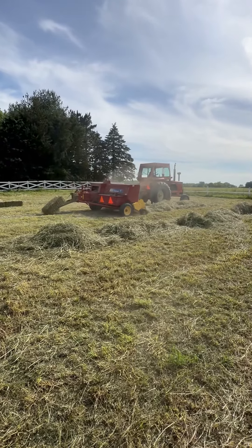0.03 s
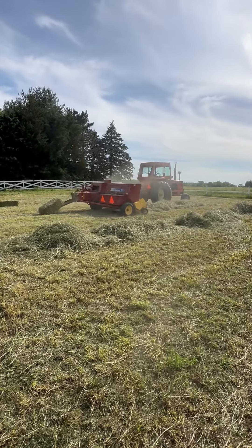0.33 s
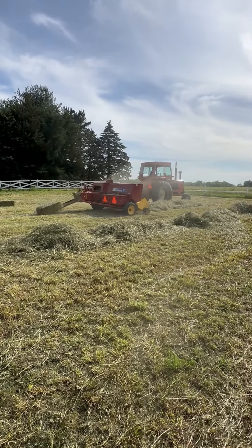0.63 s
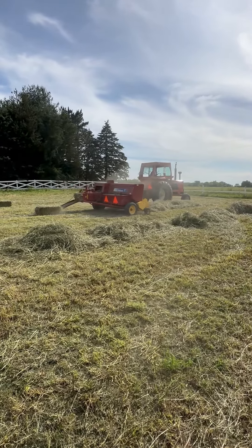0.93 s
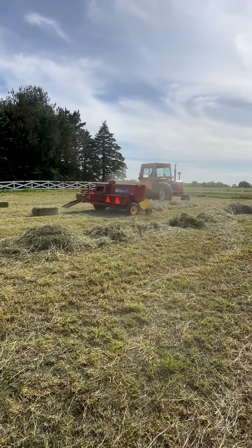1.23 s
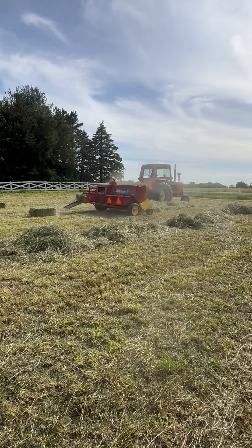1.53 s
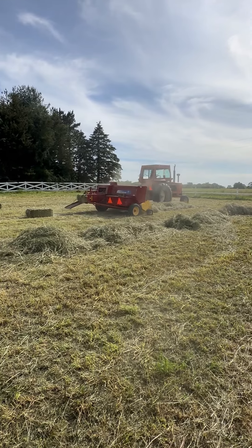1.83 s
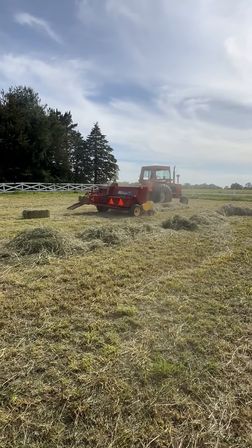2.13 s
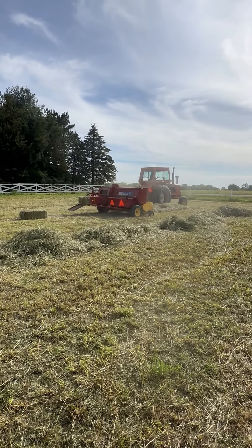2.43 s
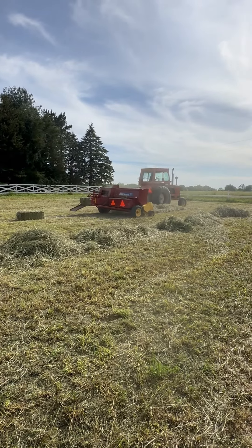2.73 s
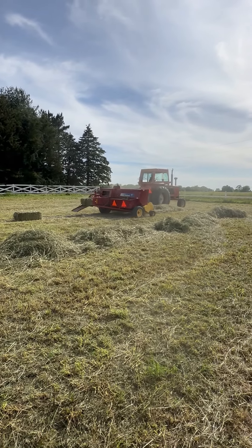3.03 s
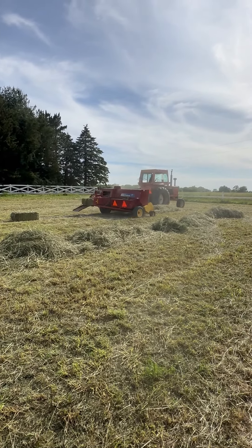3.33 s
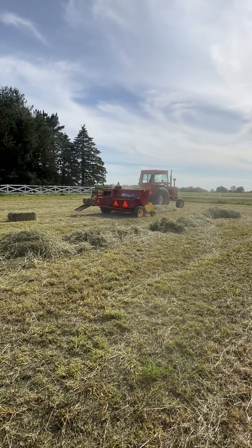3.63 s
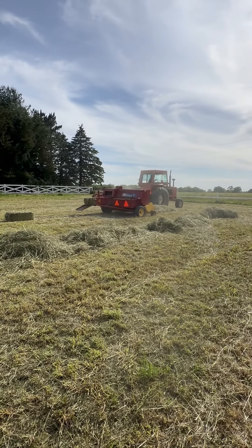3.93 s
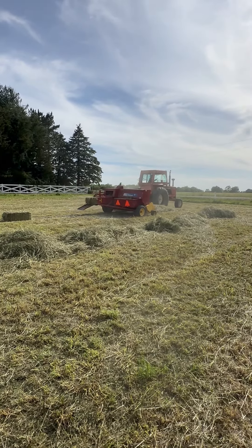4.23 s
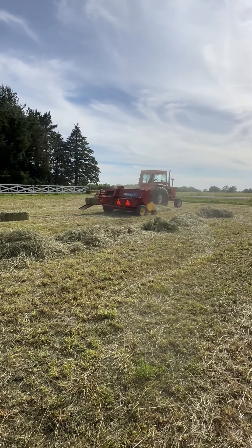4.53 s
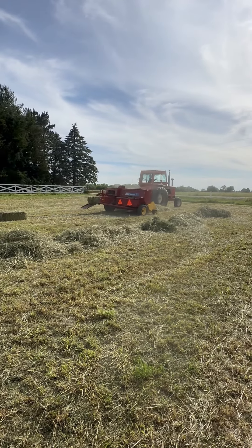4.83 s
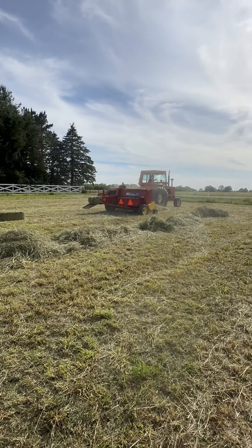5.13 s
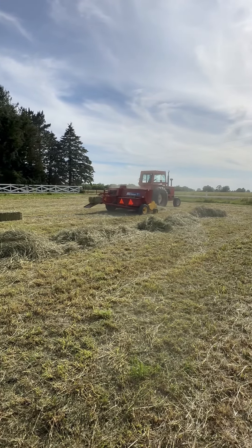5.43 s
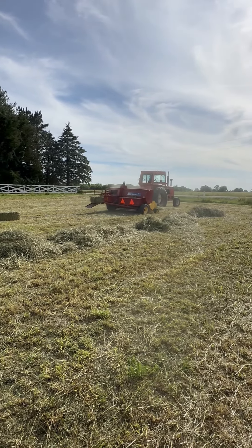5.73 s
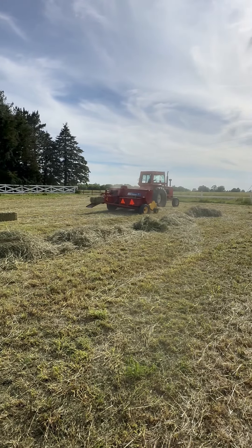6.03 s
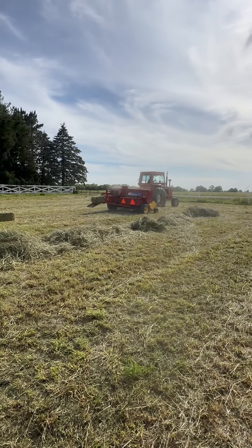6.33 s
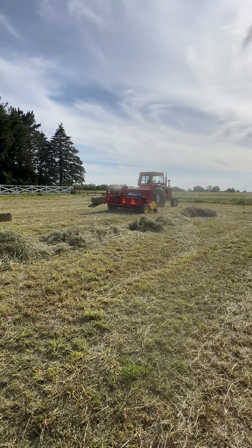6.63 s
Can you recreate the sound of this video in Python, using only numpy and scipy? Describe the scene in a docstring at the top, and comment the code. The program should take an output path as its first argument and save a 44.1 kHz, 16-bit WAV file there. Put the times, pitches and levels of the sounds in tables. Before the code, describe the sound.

Rhythmic crunching thumps and metal rattles of a hay baler working a field over the low hum of a diesel tractor.

```python
"""A low drone and rumble, broken about 83 times a minute by a clack and a crunching thud: a tractor
draws a small square baler slowly away over a hay field, some 20 m from a phone. Periodic firing makes
the diesel's hum; blows excite the resonances of the sheet-metal bale case. At each crank turn the feeder
clacks and the plunger shears a charge of hay, while chains and tines rattle. Early on the knotter trips
and its steel parts ring; later the bass widens and a breeze rises on the microphones."""
import sys
import numpy as np
from scipy import signal
from scipy.fft import rfft, irfft, next_fast_len
from scipy.io import wavfile
from scipy.ndimage import uniform_filter1d

SR = 44100
rng = np.random.default_rng(int(sys.argv[2]) if len(sys.argv) > 2 else 0)


def file_out(sig):
    """Save sig as 16-bit WAV at sys.argv[1]."""
    # one column per channel
    cols = np.atleast_2d(sig).T
    # limit, then scale
    lim = np.clip(cols, -1, 1)
    pcm = np.round(lim * 32767).astype(np.int16)
    wavfile.write(sys.argv[1], SR, pcm)


N = 294588
TIME = np.arange(N) / SR

# Plunger strokes: start_s, shear_db, thud_db, shudder_db, return_shake_db
PLUNGER_STROKES = [(0.128, -20, -21, -24.5, 2), (0.857, -22, -19, -27, 2.5), (1.586, -22.5, -19, -24.5, 3),
                   (2.315, -24, -30.5, -26, 3), (3.021, -22.5, -19, -27, 3.5),
                   (3.736, -24, -21.5, -32.5, 4), (4.476, -23, -17.5, -29.5, 3.5),
                   (5.205, -23.5, -20, -30.5, 1), (5.925, -25.5, -17, -31, 0), (6.652, -27.5, -17, -23, 0)]
# Feeder clacks and dull knocks of the frame: start_s, level_db
FEEDER_CLACKS = [(0.0982, -28.5), (0.828, -22.5), (1.57, -20.5), (2.284, -20.5), (2.9859, -20.5),
                 (3.7064, -25.5), (4.4331, -25), (5.1807, -22.5), (5.8926, -24), (6.62, -20)]
FRAME_KNOCKS = [(0.095, -35), (0.261, -30), (0.594, -28), (1.439, -21.5), (1.967, -24.5), (2.09, -21.5),
                (2.784, -23.5), (4.515, -25), (5.752, -29)]
# Spectra of a clack, shearing hay, a thud and clattering machinery: frequency_hz, level_db
CLACK_SPECTRUM = [(300, -29), (700, -3.5), (1300, 7), (3000, 1.5), (4200, 1.5), (5000, 0.5), (6000, -1.5),
                  (8300, -6.5), (10500, -18)]
SHEAR_SPECTRUM = [(200, -9), (420, 10), (600, -4), (850, 4.5), (1300, 0.5), (2000, 0.5), (3100, -3),
                  (4200, -6.5), (6000, -7), (8000, -12.5), (10000, -16)]
THUD_SPECTRUM = [(40, -30), (100, -10), (170, 0.5), (300, -1.5), (420, -10.5), (560, -15), (1000, -42)]
CLATTER_SPECTRUM = [(250, -24), (480, -0.5), (600, 0), (760, 4), (1000, -1), (1250, 1), (1700, -4.5),
                    (2200, -3.5), (2700, -10), (3150, -9.5), (3700, -14), (6000, -19.5), (11000, -55)]

def plunger():
    """Impact excitation: the feeder clacks, stalks shear, the charge thuds home and the frame shudders."""
    clack = sum(undb(db + 3.2) * burst(t, rise=0.0008, fall=0.0055) for t, db in FEEDER_CLACKS)
    knock = sum(undb(db) * burst(t - 0.002, rise=0.0073, fall=0.011) for t, db in FRAME_KNOCKS)
    shear = thud = shudder = rebound = 0
    for t, shear_db, thud_db, shudder_db, _ in PLUNGER_STROKES:
        shear += undb(shear_db) * burst(t - 0.003, rise=0.0093, fall=0.032)
        thud += undb(thud_db - 1) * burst(t + 0.0034, rise=0.015, fall=0.072)
        shudder += undb(shudder_db) * burst(t - 0.025, rise=0.023, fall=0.062)
        for bounce in range(4):  # the linkages lose energy at each rebound
            bounce_s = t + 0.029 + 0.015 * (bounce + 0.5 * rng.random())
            rebound += undb(shear_db - 5 - 3.5 * bounce) * burst(bounce_s, rise=0.0011, fall=0.0058)
    crunch_db = 2.5  # stalks give way unevenly
    sound = np.hypot(clack, rebound) * body(impacts(rate=12000, scatter_db=2), CLACK_SPECTRUM)
    sound += shear * undb(crunch_db * walk(170)) * body(impacts(rate=6000, scatter_db=2), SHEAR_SPECTRUM)
    sound += thud * body(impacts(rate=640, scatter_db=2.5), THUD_SPECTRUM)
    frame = np.hypot(shudder * undb(crunch_db * walk(90)), knock)
    return sound + frame * body(impacts(rate=4000, scatter_db=5), CLATTER_SPECTRUM)


# Hard contacts within a stroke: start_s, crack_db, clank_db
KNIFE_CONTACTS = [(0.136, -26, -23), (1.590, -26, -29), (1.599, -34, -26), (2.319, -23.5, -28),
                  (2.331, -33, -20.5), (3.023, -25, -31), (3.034, -24, -31), (3.743, -27.5, -33),
                  (3.747, -33, -26), (5.205, -25.5, -28), (5.22, -25, -19.5), (5.929, -24.5, -23),
                  (5.935, -29, -19), (5.947, -39, -25), (6.658, -23, -23)]
# Spectrum of a cracking stalk: frequency_hz, level_db
CRACK_SPECTRUM = [(800, -24.5), (2000, 1.5), (3200, 6.5), (4200, 2), (6000, -0.5), (8300, 0.5),
                  (10500, -15.5)]

def knife():
    """Brittle fracture: thick stalks crack as the frame clanks; the feeder fork buzzes after each clack."""
    crack = sum(undb(db) * burst(t, rise=0.0012, fall=0.007) for t, db, _ in KNIFE_CONTACTS)
    clank = sum(undb(db) * burst(t, rise=0.0012, fall=0.007) for t, _, db in KNIFE_CONTACTS)
    buzz = sum(undb(db - 12) * burst(t, rise=0.0076, fall=0.018) for t, db in FEEDER_CLACKS)
    bright = np.hypot(crack, buzz) * body(impacts(rate=5000, scatter_db=2.5), CRACK_SPECTRUM)
    return bright + clank * body(impacts(rate=3000, scatter_db=0.5), CLATTER_SPECTRUM)


# Response of the sheet-metal case: frequency_hz, level_db
CASE_SPECTRUM = [(20, -50.5), (38, -38.5), (60, -12.5), (80, -5), (115, -3.5), (160, 0), (220, -2.5),
                 (300, -6.5), (410, -9.5), (500, -24.5), (800, -44.5)]
# Single low booms of the case, and a few brief swells of the engine's drone near 90 Hz:
# start_s, level_db, pitch_hz
BOOMS_AND_SWELLS = [(0.14, -18, 325), (0.181, -13.5, 157), (0.602, -16.5, 142), (0.864, -14, 297),
                    (0.884, -10.5, 158), (1.122, -8, 168), (1.463, -12.5, 244), (1.519, -9, 285),
                    (1.598, -18, 346), (2.159, -16, 420), (2.610, -14.5, 166), (3.041, -15.5, 328),
                    (3.097, -16.5, 398), (3.308, -16, 158), (4.275, -16, 196), (4.494, -16.5, 430),
                    (4.525, -13, 169), (4.689, -10.5, 139), (5.01, -13, 172), (5.400, -9.5, 166.5),
                    (5.455, -10.5, 179), (5.575, -16, 202), (5.634, -21, 94.5), (5.845, -18.5, 260),
                    (5.965, -18, 382), (6.01, -8.5, 151), (6.10, -11.5, 131), (6.175, -17, 95),
                    (6.225, -15.5, 202), (6.425, -17, 89), (6.60, -10, 217)]

def bale_case(throb):
    """Panel resonance: uneven knocks keep the case rumbling, and each stroke rings chamber and walls."""
    # three chugs a crank turn: stroke, return and feeder fork
    chug_db = 1.5 * np.cos(2 * np.pi * 3 * (crank_turns() - 0.047))
    return_db = sum(db * swell(t + 0.25, width=0.18) for t, *_, db in PLUNGER_STROKES)
    knocks = impacts(rate=200, scatter_db=1) + 1.17 * rng.standard_normal(N)
    shake_db = -25 + chug_db + 0.5 * walk(16) + return_db
    low_tones = sum(strike(t, db, hz, t60=0.12, rise=0.0013) for t, db, hz in BOOMS_AND_SWELLS)
    chamber = sum(strike(t + 0.0235, db, hz=170 * rng.normal(1, 0.055), t60=0.36, rise=0.0099)
                  for t, _, db, *_ in PLUNGER_STROKES)
    walls = sum(strike(t + 0.01197, db - 14, hz=405 * rng.normal(1, 0.056), t60=0.44, rise=0.013)
                for t, _, db, *_ in PLUNGER_STROKES)
    return body(knocks, CASE_SPECTRUM) * throb * undb(shake_db) + low_tones + chamber + walls


# Course of the diesel: time_s, firing_hz, hum_gain_db
DIESEL_COURSE = [(0, 87.3, 2), (1.3, 88.36, -0.5), (1.7, 86.9, 0), (2.2, 87.46, -8), (3.2, 87.71, 0.5),
                 (4.2, 87.47, 3.5), (4.7, 87.4, 3.5), (6.68, 88.16, 3.5)]
# Exhaust partials: firing_multiple, level_db
EXHAUST_PARTIALS = [(.5, -52), (1, -35.5), (2, -39.5), (3, -40)]

def diesel():
    """Periodic excitation: the hum follows the wandering firing rate; a faint whine wavers near 710 Hz."""
    firing_hz = curve(DIESEL_COURSE)
    phase = 2 * np.pi * np.cumsum(firing_hz * (1 + 0.035 * walk(24))) / SR
    hum = sum(undb(db + 2.4 * walk(9)) * np.sin(multiple * phase + 2 * np.pi * rng.random())
              for multiple, db in EXHAUST_PARTIALS)
    hum *= waver(rate=19, depth_db=3 + 4 * curve(BASS_SPREAD))  # deeper as the breeze rises
    hum *= undb(curve(DIESEL_COURSE, axis=2))
    gear_hz = 8.11 * np.mean(firing_hz) * (1 + 0.01094 * walk(30))
    whine = undb(-43.5) * waver(rate=19, depth_db=2.2) * np.sin(2 * np.pi * np.cumsum(gear_hz) / SR)
    return np.sqrt(2) * (hum + whine)


# Spectrum of chain links in contact: frequency_hz, level_db
CHAIN_SPECTRUM = [(1500, -33), (3000, 3.5), (3900, 4.5), (5000, -2.5), (5900, 9), (6800, 0), (8200, 7),
                  (9300, -0.5), (10500, -28)]

def running_gear():
    """Superposed impacts: gears and pickup clatter and chains tick, louder under each stroke's load."""
    blows = impacts(rate=900, scatter_db=1.5) + 1.59 * rng.standard_normal(N)
    clatter = body(blows * undb(walk(70)), CLATTER_SPECTRUM)
    ticks = impacts(rate=590, scatter_db=5) + 2.1 * rng.standard_normal(N)
    ticks *= waver(rate=65, depth_db=3.5)
    chain = body(ticks, CHAIN_SPECTRUM) + undb(-25) * ring(ticks, STEEL_MODES, t60_scale=0.93)
    tying_db = 5.5 * swell(1.98, width=0.115)  # the chains drive the knotter round
    load_db = 0.87 * np.cos(2 * np.pi * (crank_turns() - 0.18))
    distance_db = -0.24 * TIME
    return (clatter * undb(-28.5) + chain * undb(-42 + tying_db)) * undb(load_db + distance_db)


# Rattles of slack chain and linkages: start_s, level_db, decay_s
STEEL_RATTLES = [(0.172, -33, 0.015), (0.292, -26, 0.018), (0.458, -26.5, 0.015), (0.599, -25, 0.0089),
                 (0.67, -34, 0.012), (0.983, -26, 0.012), (1.163, -26.5, 0.028), (1.438, -31.5, 0.053),
                 (1.523, -28, 0.0083), (1.846, -21, 0.023), (1.974, -21.5, 0.0049), (2.088, -25.5, 0.007),
                 (2.189, -25, 0.015), (2.43, -30, 0.017), (2.505, -30, 0.0069), (2.565, -29, 0.012),
                 (2.78, -33.5, 0.012), (2.896, -25.5, 0.021), (3.186, -22.5, 0.0099), (3.204, -22, 0.02),
                 (3.388, -31, 0.012), (3.456, -24, 0.0078), (3.515, -26, 0.008), (3.576, -25.5, 0.0089),
                 (3.893, -28, 0.015), (3.944, -27.5, 0.011), (4.065, -24.5, 0.025), (4.176, -28, 0.01),
                 (4.231, -31.5, 0.0075), (4.305, -32, 0.0083), (4.578, -31, 0.03), (4.639, -24.5, 0.016),
                 (4.748, -25.5, 0.012), (4.801, -24.5, 0.018), (4.943, -23.5, 0.017), (5.523, -23.5, 0.011),
                 (5.576, -26.5, 0.01), (5.626, -26.5, 0.007), (5.668, -25, 0.017), (5.811, -21.5, 0.017),
                 (6.052, -26.5, 0.024), (6.238, -29, 0.02), (6.393, -25.5, 0.009), (6.54, -24.5, 0.02)]

def loose_steel():
    """Contact chatter: slack parts rattle in bursts, and each passing tine bar adds a flurry of ticks."""
    bars_per_turn, lag_s = 5, 0.017
    turns = crank_times()
    passes = np.concatenate([np.linspace(start, end, bars_per_turn, endpoint=False)[1:]
                             for start, end in zip(turns, turns[1:])]) + lag_s
    bars = sum(undb(rng.normal(-44.5, 4)) * burst(t, rise=0.028, fall=0.024) for t in passes if t > 0)
    chatter = sum(undb(db - 6.5) * burst(t - 0.001, rise=decay / 2, fall=decay)
                  for t, db, decay in STEEL_RATTLES)
    ticks = impacts(rate=2500, scatter_db=-0.5)
    steel = body(ticks, CHAIN_SPECTRUM) + undb(-16.5) * ring(ticks, STEEL_MODES, t60_scale=0.85)
    return np.hypot(bars, chatter) * steel


# Catches of the knotter's clutch: start_s, level_db
CLUTCH_CATCHES = [(0.859, -16.5), (0.863, -29), (0.877, -23.5)]
# Modes of the clutch: frequency_hz, level_db, t60_s
CLUTCH_MODES = [(3101, -9, .13), (3278, -8, .12), (3779, -7, .12), (4350, -9, .05), (5319, -11, .07),
                (5873, -8, .06), (6722, -1.5, .12), (7241, -9, .1), (7700, 0, .11), (8140, -9, .05),
                (8652, 0, .13), (9703, -5, .13)]

def clutch():
    """Transient and free decay: the clutch catches with a broadband crash, then its modes ring briefly."""
    contact = sum(undb(db) * burst(t - 0.001, rise=0.0017, fall=0.015) for t, db in CLUTCH_CATCHES)
    crash = undb(-6) * body(impacts(rate=15000, scatter_db=-5), CHAIN_SPECTRUM)
    crash += undb(-8.5) * body(impacts(rate=8800, scatter_db=2), CLACK_SPECTRUM)
    ringing = sum(chime(t, db - 3, CLUTCH_MODES, scatter_db=2.5) for t, db in CLUTCH_CATCHES)
    return contact * crash + ringing


# Clinks of the knotter: start_s, ring_db, scrape_db
KNOTTER_CLINKS = [(1.622, -31, -29.5), (1.673, -26.5, -28.5), (1.687, -23.5, -42), (1.706, -30, -37),
                  (1.86, -37, -34), (2.01, -36, -30), (2.041, -36, -31.5), (2.094, -40, -28.5)]
# Modes of small steel parts: frequency_hz, level_db, t60_s
STEEL_MODES = [(3219, -15, .15), (3445, -15, .15), (3806, -8, .11), (4330, -14, .12), (4613, -16, .14),
               (5157, -12, .12), (5303, -9, .16), (5561, -12, .11), (5749, -4.5, .13), (6729, -6, .13),
               (6923, -7, .14), (7074, -12, .12), (7235, -8, .12), (7720, 1.5, .14), (7994, -13, .13),
               (8388, -9, .1), (8646, -13, .12)]

def knotter():
    """Inharmonic modes: needles and hooks scrape, then ring while chattering against their neighbours."""
    scrape = sum(undb(db) * burst(t - 0.003, rise=0.003, fall=0.017) for t, _, db in KNOTTER_CLINKS)
    jingle = sum(chime(t, db, STEEL_MODES, scatter_db=3) for t, db, _ in KNOTTER_CLINKS)
    jingle *= waver(rate=260, depth_db=3)
    return jingle + scrape * body(impacts(rate=7600, scatter_db=3.5), CHAIN_SPECTRUM)


# Single pings of struck steel parts: start_s, level_db, pitch_hz
STEEL_PINGS = [(0.099, -14, 865), (0.876, -15, 870), (1.53, -24.5, 2950), (1.567, -22, 8500),
               (1.817, -29, 7100), (1.856, -23, 8050), (1.97, -20, 7400), (2.092, -21.5, 4030),
               (2.092, -23, 2880), (2.096, -24, 7700), (5.628, -27, 4140), (5.63, -28, 3820)]

def steel_pings():
    """Free vibration: a struck steel part pings in one quickly damped mode."""
    return sum(strike(t, db, hz, t60=0.044, rise=0.00098) for t, db, hz in STEEL_PINGS)


# Thick wads of hay fed in ahead of some strokes: centre_s, level_db
HAY_WADS = [(1.472, -29), (2.181, -30), (4.42, -35.5)]

def hay_wads():
    """Sliding friction: a wad scrapes along the chamber and makes its walls rumble."""
    push = sum(undb(db) * swell(t, width=0.074) for t, db in HAY_WADS)
    scrape = body(impacts(rate=3000, scatter_db=0), SHEAR_SPECTRUM)
    rumble = undb(7.5) * body(impacts(rate=1200, scatter_db=1.5), THUD_SPECTRUM)
    return push * (scrape + rumble)


def machines():
    """Superposition along one path; an unbalanced drive shaft modulates drone and case once a turn."""
    shaft_hz = 8.4 * (1 + 0.1 * walk(6))
    throb = unit(undb(1.4 * np.sin(2 * np.pi * np.cumsum(shaft_hz) / SR)))
    return (diesel() * throb + bale_case(throb) + running_gear() + hay_wads() + plunger() + knife()
            + loose_steel() + clutch() + knotter() + steel_pings())


# Direct sound at the two microphones: frequency_hz, left_minus_right_db, left_lead_rad
DIRECTION_CUES = [(170, -0.0, -0.1), (300, -1.8, -0.1), (430, -7.4, 0.2), (520, -1.8, 2.1), (610, 6.8, 3.3),
                  (700, 1.7, 5.1), (920, -11.7, 5.8), (1050, -6.2, 7.3), (1300, -2.1, 7.3),
                  (1460, 6.1, 6.8), (1650, -1.2, 6.1), (2100, -5.3, 7.0), (2400, -0.3, 7.5),
                  (2580, 7.4, 8.2), (2800, -2.2, 5.9), (3200, 4.7, 6.7), (3650, -1.8, 5.1),
                  (4150, 0.2, 6.7), (4800, 1.6, 5.6), (5800, -1.1, 7.1), (7000, 2.6, 5.8), (9000, 0.3, 5.0)]
# Share thrown back by the ground and the tree line: frequency_hz, level_db
SCATTER_SPECTRUM = [(200, -67.5), (450, -8), (620, -2.5), (750, -16), (1700, -15), (2200, -14),
                    (2600, -3.5), (3000, -10.5), (3500, -8), (5200, -4.5), (6700, -15), (8500, -1.5),
                    (10000, -13)]

def microphone_pair(direct, scattered):
    """Level and phase differences give direction; scattered sound arrives in the opposite pattern."""
    size = next_fast_len(N + 4096, True)
    ratio = undb(over_hz(DIRECTION_CUES, size))
    lead = over_hz(DIRECTION_CUES, size, axis=2)
    equal_power = np.sqrt(2 / (1 + ratio ** 2))
    left, right = np.array([ratio * np.exp(1j * lead / 2), np.exp(-1j * lead / 2)]) * equal_power
    diffuse = rfft(scattered, size) * undb(over_hz(SCATTER_SPECTRUM, size)) * np.conj([right, -left])
    return irfft(rfft(direct, size) * np.array([left, right]) + diffuse, size)[:, :N]


# Spread of the bass from the centre to the sides: time_s, share
BASS_SPREAD = [(3.7, 0.08), (4.1, 0.42), (5.3, 0.48), (5.7, 0.64), (6.68, 0.8)]
# Hollowing of the low midrange between strokes: time_s, gain_db
MIDRANGE_HOLLOW = [(4.3, -5.5), (5.4, -5.5), (5.75, -12.5), (6.3, -10.5), (6.68, -25)]
# Brief dips of the lows at the centre: centre_s, width_s, bass_db, low_mid_db
CENTRE_DIPS = [(4.14, 0.0093, -5, -1), (4.865, 0.024, -16, -4), (5.54, 0.023, -11, -3),
               (5.675, 0.014, -10, -3), (5.752, 0.027, -10.5, -14), (6.085, 0.012, -5, -5),
               (6.305, 0.035, -3, -25), (6.40, 0.015, -7, -3), (6.485, 0.018, -14, -2),
               (6.61, 0.04, -0.5, -6)]

def widen_lows(pair, scattered):
    """Mid-side balance: the lows leave the centre, and a diffuse rumble takes their place at the sides."""
    mid = pair.mean(axis=0)
    bass = low_pass(mid, hz=293, order=8)
    low_mid = low_pass(mid, hz=852, order=8) - bass
    spread = curve(BASS_SPREAD)
    upper_band = low_pass(scattered, hz=1050) - low_pass(scattered, hz=600)
    side = spread * (undb(2) * low_pass(scattered, hz=800) + undb(-6.5) * upper_band)
    stroke_fill = sum(swell(t + 0.027, width=0.16) for t, *_ in PLUNGER_STROKES)
    hollow_db = curve(MIDRANGE_HOLLOW) * (1 - stroke_fill) * np.exp(0.36 * walk(28))
    bass_dip_db = sum(db * swell(t, width) for t, width, db, _ in CENTRE_DIPS)
    low_mid_dip_db = sum(db * swell(t, width) for t, width, _, db in CENTRE_DIPS)
    bass_gain = np.sqrt(1 - spread) * undb(bass_dip_db)
    low_mid_gain = undb(hollow_db + low_mid_dip_db)
    return pair + (bass_gain - 1) * bass + (low_mid_gain - 1) * low_mid + np.array([side, -side])


# Spectrum of wind on the microphones: frequency_hz, level_db
BREEZE_SPECTRUM = [(20, -22.5), (45, -19.5), (70, 5.5), (100, 4.5), (150, -10.5), (260, -19), (600, -41)]

def breeze():
    """Turbulent pressure: a gusty rumble drives the microphones in antiphase, rising as the bass spreads."""
    rumble = body(rng.standard_normal(N), BREEZE_SPECTRUM)
    rumble *= undb(-42 - walk(8)) * np.sqrt(curve(BASS_SPREAD))
    return np.array([rumble, -rumble])


def crank_times():
    """Times of whole crank turns: the strokes, and one more before and after."""
    times = np.array(PLUNGER_STROKES)[:, 0]
    period = np.mean(np.diff(times))
    return np.concatenate([[times[0] - period], times, [times[-1] + period]])


def crank_turns():
    """Crank phase in turns; whole numbers at the strokes."""
    times = crank_times()
    return np.interp(TIME, times, np.arange(len(times)))


def impacts(rate, scatter_db):
    """Shot noise: random tiny blows, rate a second, their sizes spread by scatter_db; rms 1."""
    hits = (rng.random(N) < rate / SR) * np.sign(rng.standard_normal(N))
    return unit(hits * undb(scatter_db * np.minimum(rng.standard_normal(N), 2.1)))


def body(x, spectrum, size=4096):
    """Source and filter: x drives a minimum-phase resonator with the given spectrum; rms 1."""
    cepstrum = irfft(np.log(undb(over_hz(spectrum, size))))
    cepstrum[1:size // 2] *= 2
    cepstrum[size // 2 + 1:] = 0
    response = irfft(np.exp(rfft(cepstrum)))
    return unit(signal.fftconvolve(x, response)[:N])


def ring(x, modes, t60_scale):
    """Forced vibration: x is convolved with the impulse response of damped modes; rms 1."""
    age = TIME[:SR // 3]
    response = sum(undb(db - 60 * age / (t60 * t60_scale)) * np.sin(2 * np.pi * hz * age)
                   for hz, db, t60 in modes)
    return unit(signal.fftconvolve(x, response)[:N])


def strike(start, db, hz, t60, rise):
    """Damped oscillator: one struck mode, falling 60 dB in t60 seconds."""
    age = TIME[:SR // 3]
    envelope = undb(db - 60 * age / t60) * np.minimum(age / rise, 1)
    return delayed(envelope * np.sin(2 * np.pi * (hz * age + rng.random())), start)


def chime(start, db, modes, scatter_db):
    """Modal superposition: where a blow chances to land decides which modes ring most."""
    return sum(strike(start, db + rng.normal(mode_db, scatter_db), hz, t60, rise=0.0037)
               for hz, mode_db, t60 in modes)


def burst(start, rise, fall):
    """Envelope with a linear rise and an exponential decay; times in seconds."""
    age = TIME[:SR // 2]
    return delayed(np.minimum(age / rise, 1) * np.exp(-np.maximum(age - rise, 0) / fall), start)


def delayed(x, start):
    """Place x at start seconds in N samples of silence."""
    return np.concatenate([np.zeros(int(start * SR)), x, np.zeros(N)])[:N]


def swell(centre, width):
    """Gaussian envelope of height 1."""
    return np.exp(-((TIME - centre) / width) ** 2)


def walk(rate):
    """Smooth random fluctuation through rate values a second; rms 1."""
    step = int(SR / rate)
    return unit(uniform_filter1d(np.repeat(rng.standard_normal(N // step + 1), step), step)[:N])


def waver(rate, depth_db):
    """Random amplitude modulation: a gain of rms 1 with free dips and limited peaks."""
    return unit(undb(depth_db * np.minimum(walk(rate), 1)))


def low_pass(x, hz, order=4):
    """Zero-phase filtering: what lies under hz, with no delay."""
    return signal.sosfiltfilt(signal.butter(order, hz, fs=SR, output="sos"), x)


def curve(rows, axis=1):
    """One column of a table, interpolated in time."""
    rows = np.array(rows)
    return np.interp(TIME, rows[:, 0], rows[:, axis])


def over_hz(rows, size, axis=1):
    """One column of a table, interpolated in log frequency onto the bins of a transform."""
    rows = np.array(rows)
    return np.interp(np.log(np.arange(size // 2 + 1) * SR / size + 1), np.log(rows[:, 0]), rows[:, axis])


def undb(db):
    """Decibels to gain."""
    return 10 ** (np.asarray(db) / 20)


def unit(x):
    """Scale to rms 1."""
    return x / np.sqrt(np.mean(x ** 2))


def scene():
    """Direct and diffuse fields: the machines along two paths, with widening lows and a breeze."""
    direct, scattered = machines(), machines()
    return widen_lows(microphone_pair(direct, scattered), scattered) + breeze()


# Peaks and dips from the phone's body: centre_hz, width_hz, gain_db
PHONE_RESPONSE = [(424, 16.6, 3), (1000, 23, -8.5), (2110, 16, -6), (3074, 103, 3), (3500, 86, -4),
                  (4995, 49, -24.5)]

def record(dry):
    """Frequency response: the phone adds a few narrow peaks and dips and cuts the top."""
    size, cutoff_hz = next_fast_len(N + 4096, True), 9850
    bin_hz = np.arange(size // 2 + 1) * SR / size
    colour_db = sum(db * np.exp(-((bin_hz - hz) / width) ** 2) for hz, width, db in PHONE_RESPONSE)
    coloured = irfft(rfft(dry, size) * undb(colour_db), size)[:, :N]
    return signal.sosfilt(signal.ellip(8, 0.2, 70, cutoff_hz, fs=SR, output="sos"), coloured)


dry = scene()
out = record(dry)
file_out(out)
```